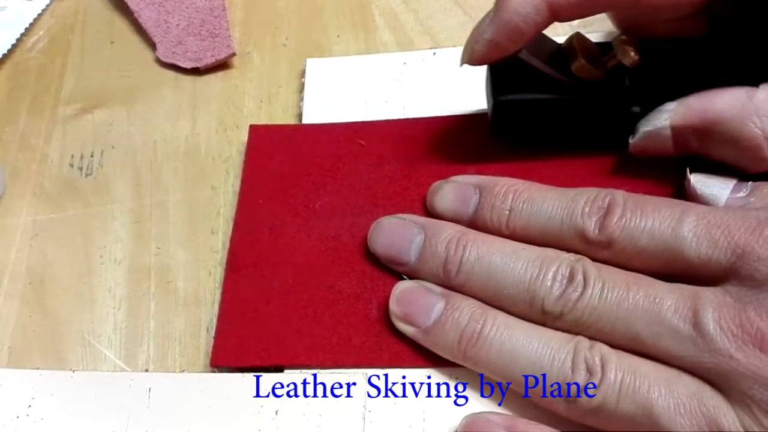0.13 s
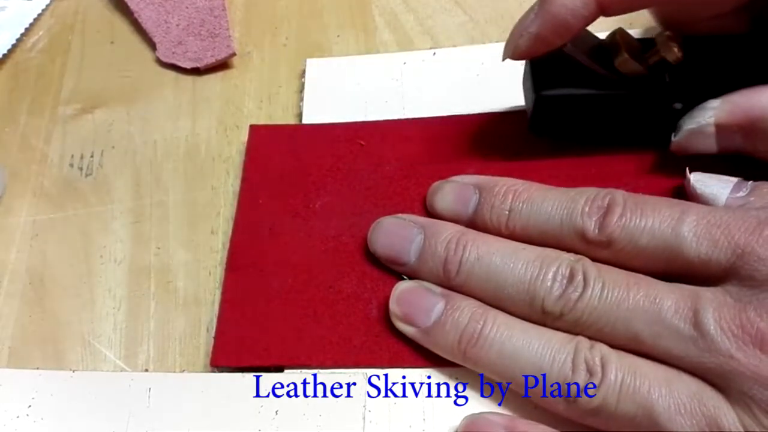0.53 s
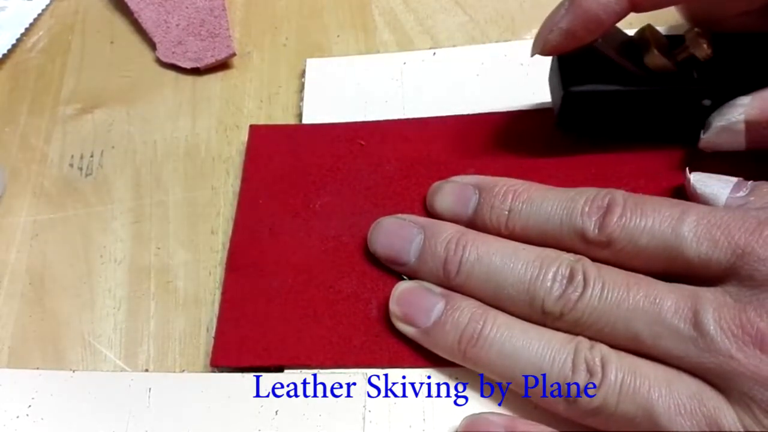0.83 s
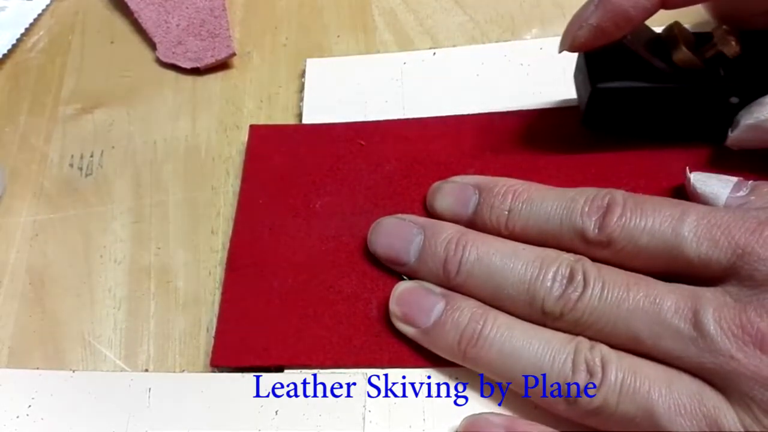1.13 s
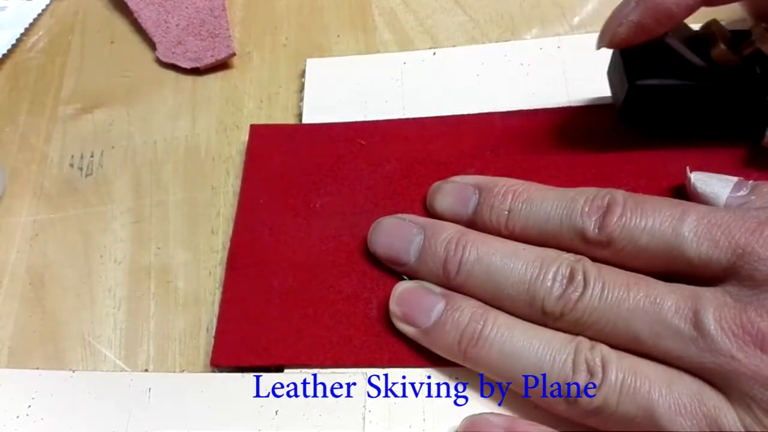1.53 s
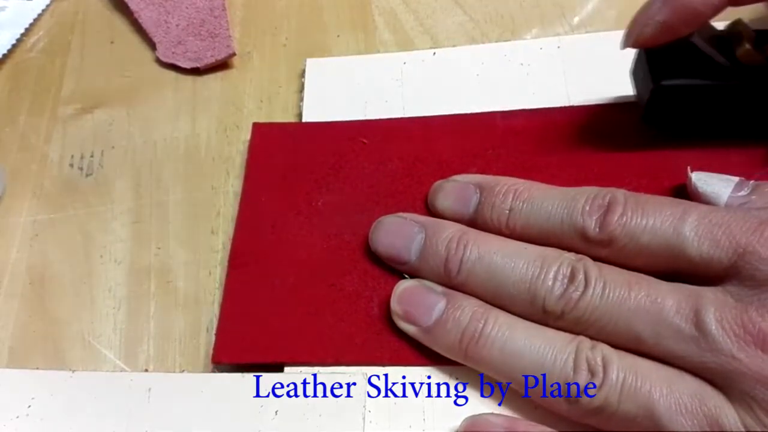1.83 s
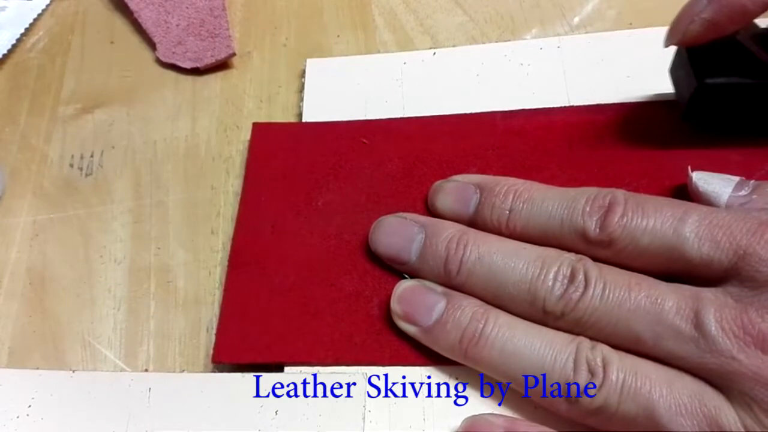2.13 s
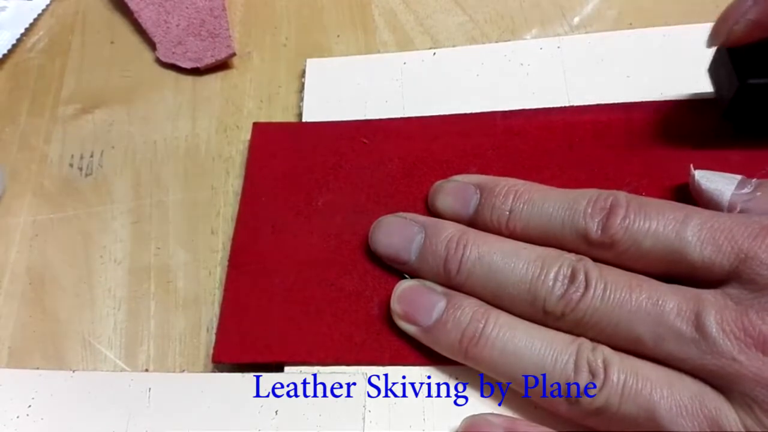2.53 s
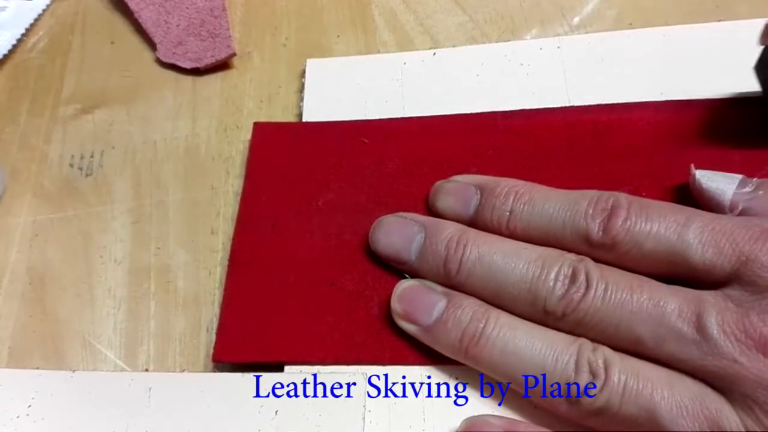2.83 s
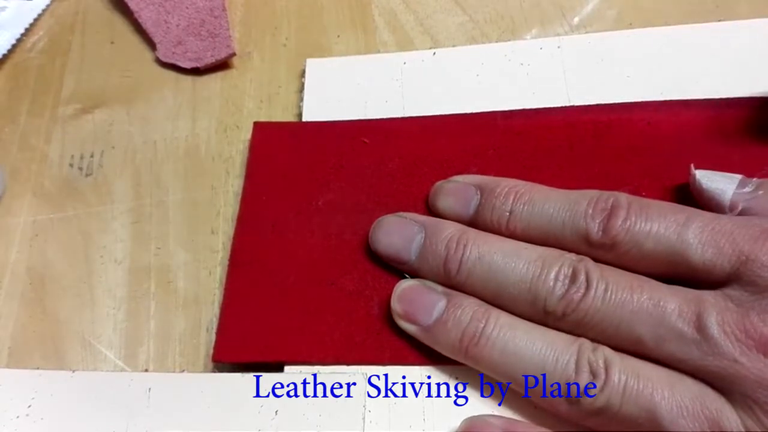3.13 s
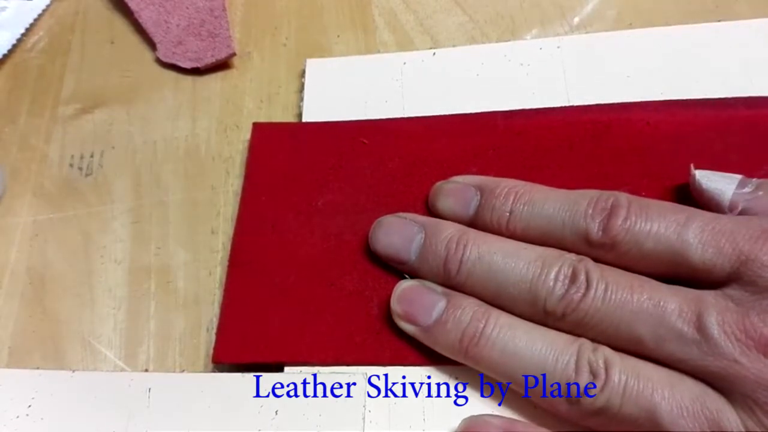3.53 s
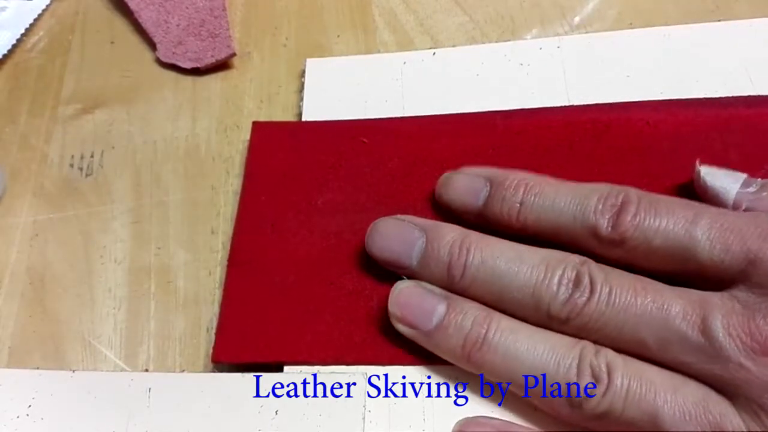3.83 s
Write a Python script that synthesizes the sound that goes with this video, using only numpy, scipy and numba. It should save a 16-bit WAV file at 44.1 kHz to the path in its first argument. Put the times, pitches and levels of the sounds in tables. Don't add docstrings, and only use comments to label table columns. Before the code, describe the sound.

A hand plane scrapes along a leather edge on a wooden table, buzzing and stuttering with brief hitches, growing brighter, then slips off with a knock and tiny tick; close stereo microphone in a quiet, small room.

```python
import sys
import numpy as np
from scipy import signal
from scipy.fft import rfft, irfft, next_fast_len
from scipy.io import wavfile
from numba import njit

SR = 44100
rng = np.random.default_rng(int(sys.argv[2]) if len(sys.argv) > 2 else 0)


def int16_out(signal):
    q = np.round(np.clip(np.atleast_2d(signal).T, -1, 1) * 32767)
    wavfile.write(sys.argv[1], SR, q.astype(np.int16))


def invert_db(x):
    u = np.asarray(x, float) / 20
    return 10 ** u


N = 176400

# start_s, level_db
BLADE_SLIPS = [(0.0119, -32), (0.0334, -31.5), (0.0537, -37), (0.0737, -46.5), (0.0947, -37),
               (0.1084, -36.5), (0.1297, -37), (0.1412, -41.5), (0.1541, -35), (0.1744, -31), (0.1952, -40),
               (0.2056, -39.5), (0.2251, -33), (0.265, -37), (0.283, -38.5), (0.2996, -43.5), (0.319, -31),
               (0.3396, -31), (0.361, -38.5), (0.3815, -28.5), (0.3973, -26.5), (0.4128, -33.5),
               (0.4297, -28), (0.4461, -28.5), (0.4625, -25.5), (0.4802, -31), (0.5039, -29), (0.5284, -34),
               (0.5586, -40.5), (0.5798, -33.5), (0.5975, -32), (0.616, -32.5), (0.6365, -30),
               (0.6519, -37), (0.6684, -33.5), (0.6864, -32), (0.7037, -35), (0.7214, -32), (0.7519, -26.5),
               (0.7775, -32.5), (0.7921, -31), (0.813, -30.5), (0.8292, -31.5), (0.8448, -31.5),
               (0.8687, -27.5), (0.8894, -31),
               (0.9034, -32.7), (0.9218, -33), (0.9399, -33), (0.9615, -29), (0.9798, -37),
                (1.0115, -27.5), (1.0336, -39.5), (1.0455, -34.5), (1.058, -36), (1.0768, -28.5),
                (1.1052, -32.5), (1.1235, -35), (1.135, -37), (1.155, -32.9), (1.1715, -31),
                (1.1936, -34.5), (1.2187, -85), (1.2389, -35.5), (1.2637, -37.5), (1.292, -47.5),
                (1.3195, -43), (1.3356, -32.4), (1.3508, -36), (1.369, -29), (1.388, -54), (1.4007, -67),
                (1.433, -25), (1.4637, -23.5), (1.4806, -24.5), (1.4993, -25.5), (1.5155, -30),
                (1.531, -25), (1.5484, -28), (1.5681, -29),
               (1.7651, -24.5), (1.7834, -28.5), (1.798, -28), (1.8148, -22.5), (1.8324, -23.5),
               (1.8474, -23), (1.8629, -25.5), (1.8793, -23.5), (1.8981, -24.5), (1.917, -31),
               (1.9318, -28), (1.9492, -28.5), (1.9675, -29), (1.9859, -26.5), (2.0046, -30),
               (2.0196, -33.5), (2.0359, -29.5), (2.0587, -26), (2.0781, -28.5), (2.093, -26.5),
               (2.1099, -25.5), (2.127, -32.2), (2.1416, -28), (2.163, -27.5), (2.178, -29.5),
               (2.2013, -30.2), (2.2283, -28), (2.2423, -43), (2.257, -37.5), (2.277, -39), (2.2919, -34),
               (2.3105, -35), (2.325, -30), (2.3439, -29), (2.3583, -27.5), (2.3769, -35.5),
               (2.3938, -28.5), (2.415, -32), (2.4354, -36.5), (2.455, -52), (2.5097, -29), (2.5334, -29.5),
               (2.553, -27.5), (2.5694, -23.5), (2.5866, -24), (2.6035, -23), (2.62, -24.5), (2.6372, -21),
               (2.6566, -27), (2.6746, -28), (2.694, -29),
               (2.7359, -42), (2.761, -35), (2.7794, -33.5), (2.792, -30), (2.8076, -26), (2.8256, -26.5),
              (2.8388, -25), (2.855, -21.5), (2.8936, -24.5), (2.9116, -34), (2.926, -33.5),
              (2.9465, -26.5), (2.9608, -29), (2.9749, -24), (2.9884, -21), (3.0056, -23.5), (3.0178, -27),
              (3.036, -24.5), (3.051, -25), (3.0659, -19), (3.0784, -27.5), (3.0988, -21.5),
              (3.1149, -23.5), (3.1295, -32.2), (3.1494, -33.5), (3.1621, -31.5), (3.1894, -30.5),
              (3.2104, -40.1), (3.2235, -30), (3.25, -29.5), (3.2628, -29.5), (3.2729, -31.5),
              (3.2885, -28.5), (3.3046, -30), (3.3166, -24.5), (3.335, -27), (3.35, -33), (3.3638, -32),
              (3.3776, -37.5), (3.3919, -36), (3.405, -39.5), (3.4245, -42), (3.442, -51), (3.4578, -40.5),
              (3.4691, -28.5), (3.485, -33.5), (3.5002, -26)]
# time_s, share_0_to_1
TRAVEL = [(0, 0.07), (1.6, 0.12), (2.4, 0.58), (2.9, 0.99), (3.1, 1), (3.45, 0.95), (3.5, 0.79), (4, 0.7)]
# middle_s, length_s, level_db
TOUCHES = [
    (3.266, 0.029, -39),
    (3.522, 0.0041, -28),
    (3.533, 0.016, -49),
    (3.538, 0.041, -52.5),
    (3.64, 0.0052, -54.5),
    (3.911, 0.013, -59.5),
    (3.996, 0.025, -56),
]
# pitch_hz, width_hz, left_db, right_db, left_right_likeness
NEAR_BODY = [(632, 960, -8, -7.5, -0.31), (923, 41, -9, -8.5, 1), (1130, 200, -13.5, -4.5, 0.89),
             (1549, 232, 0, 9, 0.77), (1660, 240, 4, -14, 1), (2545, 480, -5, -4.5, 0.15),
             (2787, 677, -8.5, 4, 0.083), (3720, 420, -1.5, -0.5, -1.02), (4314, 170, 5.5, -3, .1),
             (4680, 245, 6.5, -17, -0.97), (5306, 190, 1.5, -3, 0.9), (5930, 200, -8, -34, -1.4),
             (6430, 270, -13, -17, 1), (7660, 1400, -7.5, -30, 0.64)]
# pitch_hz, width_hz, left_db, right_db, left_right_likeness
FAR_BODY = [(1530, 236, -15.5, -5, 0.74), (1669, 167, 0, -20.5, 0.056), (2374, 290, -3, -10, -0.8),
            (2950, 340, -1, 0, -0.41), (3462, 300, -2, 6, -0.45), (3920, 440, 5, 3, -0.51),
            (4654, 1030, -2.5, -11, -1.1), (5190, 370, -6.5, -6, -0.3), (5525, 380, -6, -7, 0.93),
            (7030, 670, -9.5, -18, 0.59), (7590, 290, -12, -33.5, 0.3)]
# low_hz, high_hz
NEAR_PASS = [(450, 8160), (450, 6250)]
# low_hz, high_hz
FAR_PASS = [(1250, 8770), (1250, 8300)]
# time_s, level_db
LEAN = [(0, 7.5), (.12, 2.5), (.34, 0), (.42, 10.5), (.53, 9.5), (.6, -2), (.67, 6), (.73, -1), (.82, 6.5),
        (.92, 0), (1.38, -2.5), (1.5, 3), (1.87, 2), (2.0, 2.5), (2.15, 2), (2.4, 3.5), (3.1, -0.5),
        (3.4, 5)]
# pitch_hz, level_db, ring_time_s
TABLE_TOP = [(72, -12, 0.063), (129.6, 0.5, 0.15)]
# pitch_hz, level_db, ring_time_s
BOARDS = [(186, -8, 0.067), (248.8, -9, 0.064), (343, -13.5, 0.021), (550, -30, 0.026)]
# pitch_hz, level_db, ring_time_s
ROCKING_BOARDS = [(232, -12, 0.034), (304, -13.5, 0.032), (465, -15.5, 0.025), (630, -16, 0.045)]
# start_s, level_db
KNOCKS = [
    (3.5169, -31),
    (3.5249, -36),
    (3.536, -44),
    (3.548, -52),
    (3.555, -50.5),
    (3.569, -54),
    (3.581, -60.5),
]
# pitch_hz, level_db, ring_time_s
KNOCK_TONES = [(66.4, -10, 0.081), (136, -22, 0.04), (230, -15, 0.049), (329, 4.5, 0.037),
               (403, -22, 0.057), (590, 1.5, 0.011), (970, -1, 0.0067), (1286, -20, 0.066),
               (1770, -33, 0.024), (2585, -4, 0.034)]
# start_s, level_db
TICKS = [
    (3.6385, -60),
    (3.6403, -53),
    (3.6416, -45),
    (3.6432, -59),
]
# pitch_hz, level_db, ring_time_s
TICK_TONES = [(820, -18, 0.0046), (1410, 0.5, 0.0059), (3200, -15, .008), (4700, -2, .01)]
# pitch_hz, level_db (per Hz)
FLOOR_COLOUR = [(18, -19), (40, 13), (190, 11), (683, 3), (2560, 0.5), (5840, -4), (8800, -12),
                (11500, -10), (13500, -37)]

FORCE_DB = -5.5
FIRM_DB = -20
SLIP_RISE_S, SLIP_FALL_S, DRAG_S = 0.0034, 0.0025, 0.015


def in_time(rows):
    return np.interp(np.arange(N) / SR, *np.transpose(rows))


def rms_one(x):
    return x / np.sqrt(np.mean(x ** 2))


def train(start_s, gains):
    return np.bincount(np.clip((start_s * SR).astype(int), 0, N - 1), gains, N)


def bump(rise_s, fall_s):
    t = np.arange(-3000, 3001) / SR
    return np.exp(-np.abs(t / np.where(t < 0, rise_s, fall_s)) ** 2)


def pushes(start_s, push_db, shape):
    return signal.oaconvolve(train(start_s, invert_db(push_db)), shape, "same")


def two_ears(mid, side, alike):
    return np.sqrt(1 + alike) * mid + np.sqrt(1 - alike) * side * [[1], [-1]]


@njit
def swept(x, pull, r):
    y = x.copy()
    for row in range(len(y)):
        for _ in range(2):
            x1 = x2 = y1 = y2 = 0.0
            for i in range(y.shape[1]):
                now = (1 - r * r) / 2 * (y[row, i] - x2) + pull[i] * y1 - r * r * y2
                x1, x2, y1, y2 = y[row, i], x1, now, y1
                y[row, i] = now
    return y


def resonance(x, hz, width_hz):
    r = np.exp(-np.pi * width_hz * 1.55 / SR)
    return swept(x, 2 * r * np.cos(2 * np.pi * hz / SR), r)


def slips():
    start_s, level_db = np.transpose(BLADE_SLIPS)
    return start_s, level_db + FORCE_DB


def fibres():
    snaps_per_s, spread_db = 12000, 2
    luck = np.minimum(rng.exponential(1, (2, N)), 5)
    sizes = invert_db(spread_db * luck) * rng.choice([-1, 1], (2, N))
    return rms_one(sizes * (rng.random((2, N)) < snaps_per_s / SR))


def wander(start_s):
    share, memory = 0.035, 0.7
    steps = signal.lfilter([1], [1, -memory], rng.standard_normal(len(start_s)))
    return np.interp(np.arange(N) / SR, start_s, 1 + share * rms_one(steps))


def steady_force(start_s, push_db, way):
    t = np.arange(N) / SR
    touches = sum(invert_db(db) * np.exp(-0.5 * ((t - middle_s) / length_s) ** 2)
                  for middle_s, length_s, db in TOUCHES)
    drag = pushes(start_s, push_db, bump(SLIP_RISE_S, DRAG_S))
    return touches + invert_db(-20.5 + 9 * way) * drag


def body_sound(start_s, push_db, grit, steady, body, share, passes):
    burst = bump(SLIP_RISE_S, SLIP_FALL_S)
    scatter_db = 5 * np.minimum(rng.standard_normal((len(start_s), len(body))), 1)
    both = np.zeros((2, N))
    for k, (hz, width_hz, left_db, right_db, alike) in enumerate(body):
        octaves = max(np.log2(hz / 3000), 0)
        bright_db = 0.62 * (push_db - FIRM_DB) * octaves
        force = pushes(start_s, push_db + scatter_db[:, k] + bright_db, burst) + steady
        mid, side = resonance(grit * force * np.sqrt(share), hz * wander(start_s), width_hz)
        both += invert_db([[left_db], [right_db]]) * two_ears(mid, side, np.clip(alike, -1, 1))
    filters = [signal.butter(6, band, "band", fs=SR, output="sos") for band in passes]
    return np.array([signal.sosfilt(sos, ear) for sos, ear in zip(filters, both)])


def sheen(start_s, push_db):
    follow = 2
    firm_db = FIRM_DB + follow * (push_db - FIRM_DB)
    force = pushes(start_s, firm_db, bump(SLIP_RISE_S, DRAG_S))
    squeak = resonance(fibres() * force, 11380 * wander(start_s) ** 2, width_hz=550)
    return invert_db([[-23.5], [-39.5]]) * squeak


def blade(start_s, push_db):
    way = np.clip(in_time(TRAVEL), 0, 1)
    steady = steady_force(start_s, push_db, way)
    grit = fibres()
    near = body_sound(start_s, push_db, grit, steady, NEAR_BODY, 1 - way, NEAR_PASS)
    far = body_sound(start_s, push_db, grit, steady, FAR_BODY, way, FAR_PASS)
    return invert_db(1) * (near + far + sheen(start_s, push_db))


def sine_ring(clicks, hz, ring_s):
    r, w = invert_db(-60 / (ring_s * SR)), 2 * np.pi * hz / SR
    return signal.lfilter([0, np.sin(w)], [1, -2 * r * np.cos(w), r * r], clicks + 1e-18)


def struck(start_s, push_db, tones, scatter_db, soft_hz):
    luck_db = scatter_db * rng.standard_normal((len(start_s), len(tones)))
    out = np.zeros(N)
    for k, (hz, level_db, ring_s) in enumerate(tones):
        clicks = train(start_s, invert_db(push_db + level_db + luck_db[:, k]))
        out += sine_ring(clicks, hz, ring_s)
    return signal.sosfilt(signal.butter(2, soft_hz, fs=SR, output="sos"), out)


def table(slip_s, push_db):
    start_s = slip_s - 0.0012
    push_db = push_db + np.interp(start_s, *np.transpose(LEAN)) - 21
    deep_db = 17.5 * np.interp(start_s, *np.transpose(TRAVEL))
    top = struck(start_s, push_db, TABLE_TOP[1:], scatter_db=2, soft_hz=350)
    deep = struck(start_s, push_db + deep_db, TABLE_TOP[:1], scatter_db=2, soft_hz=138)
    mid, side = [struck(start_s + 0.002785 * rng.standard_normal(len(start_s)), push_db, tones,
                        scatter_db=6.5, soft_hz=910) for tones in (BOARDS, ROCKING_BOARDS)]
    return top + deep + mid + invert_db(-1) * side * [[1], [-1]]


def knocks():
    drop = struck(*np.transpose(KNOCKS), KNOCK_TONES, scatter_db=1.5, soft_hz=3540)
    settle = struck(*np.transpose(TICKS), TICK_TONES, scatter_db=1.5, soft_hz=5000)
    return (drop + settle) * invert_db([[1.5], [-1.5]])


def room(x):
    ring_s, wall_cut_hz = 0.15, 6000
    size = next_fast_len(N + SR)
    hz = np.arange(size // 2 + 1) * SR / size
    out = []
    for channel, lags_s in zip(x, rng.uniform(0.0062, 0.023, (2, 8))):
        answer = 0
        for k, lag_s in enumerate(lags_s):
            delay = np.exp(-2j * np.pi * hz * lag_s)
            loop = invert_db(-60 * lag_s / ring_s) * delay / (1 + 1j * hz / wall_cut_hz)
            answer = answer + (-1) ** k * loop / (1 - loop)
        out.append(irfft(rfft(channel, size) * answer, size)[:N])
    return invert_db(-23) * np.array(out)


def floor():
    alike_hz = 377
    edges = 30 * 2 ** np.arange(0, 9.1, 0.5)
    white = rng.standard_normal((2, 2, N))
    at_hz, level_db = np.transpose(FLOOR_COLOUR)
    out = np.zeros((2, N))
    for k, (low, high) in enumerate(zip(edges, edges[1:])):
        band = signal.butter(2, [low, high], "band", fs=SR, output="sos")
        mid, side = signal.sosfilt(band, white[k % 2])
        alike = 1 / (1 + low * high / alike_hz ** 2)
        gain = invert_db(np.interp(np.log(low * high) / 2, np.log(at_hz), level_db))
        out += gain * two_ears(mid, side, alike)
    return invert_db(-72) * rms_one(out)


def scene():
    start_s, push_db = slips()
    near = blade(start_s, push_db) + table(start_s, push_db) + knocks()
    return near + room(near) + floor()


def top_cut(x):
    return signal.sosfilt(signal.butter(12, 14250, fs=SR, output="sos"), x)


def record(dry):
    heard = signal.sosfilt(signal.butter(4, 60.5, "high", fs=SR, output="sos"), dry)
    return top_cut(heard)


dry = scene()
out = record(dry)
int16_out(out)
```